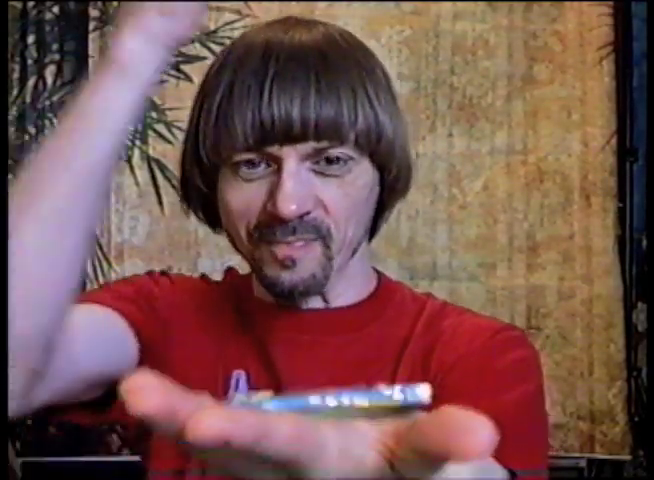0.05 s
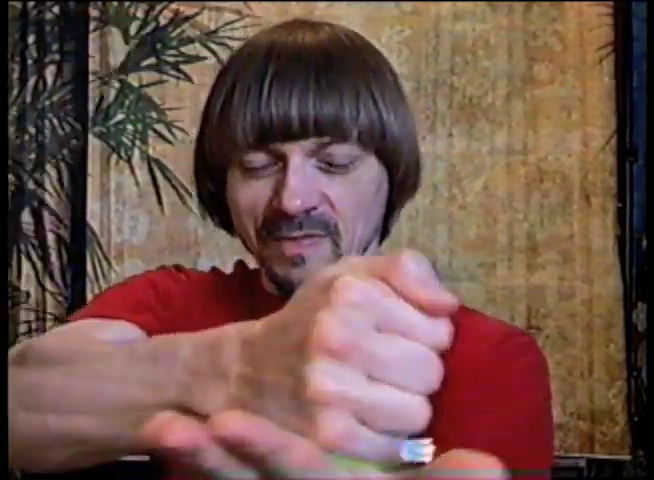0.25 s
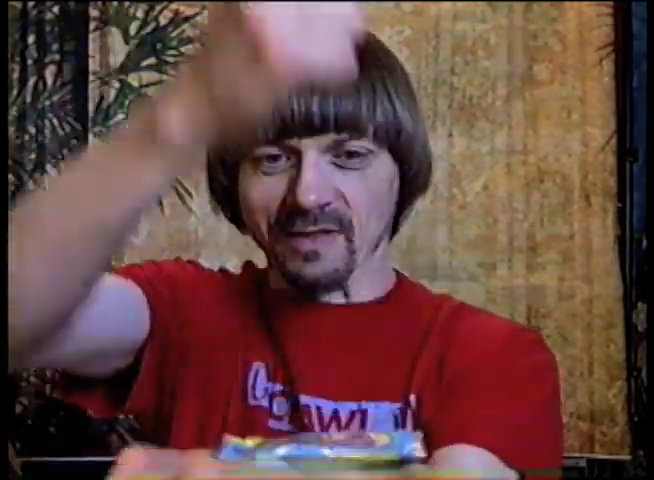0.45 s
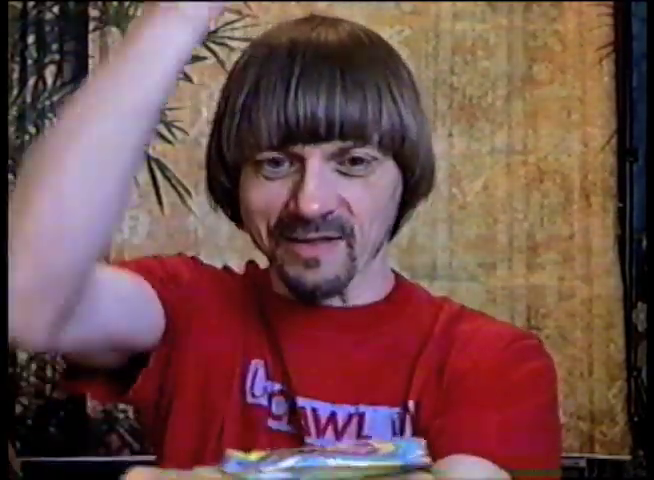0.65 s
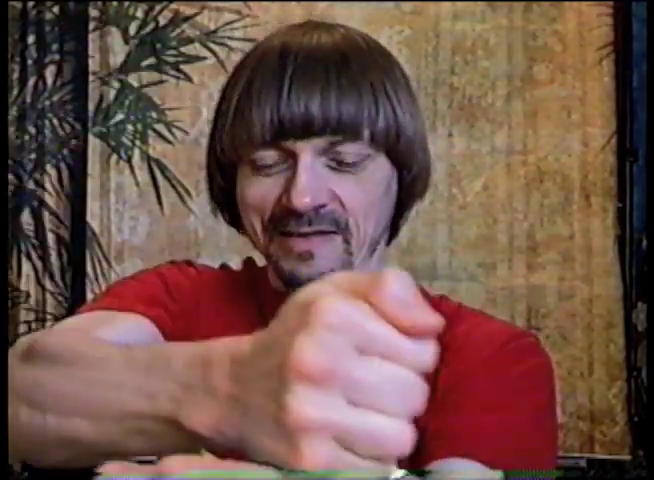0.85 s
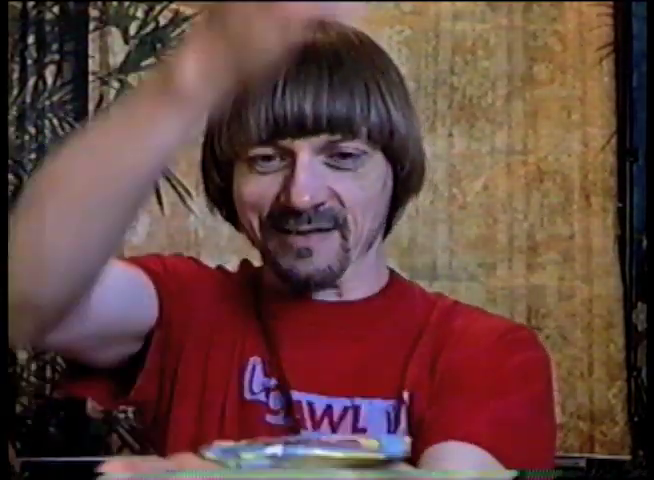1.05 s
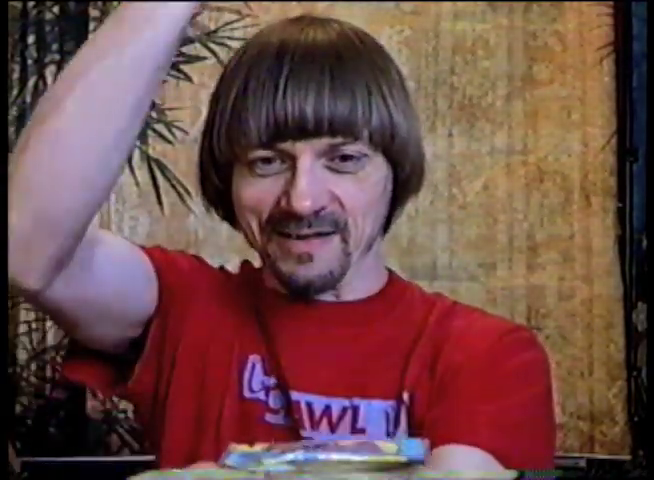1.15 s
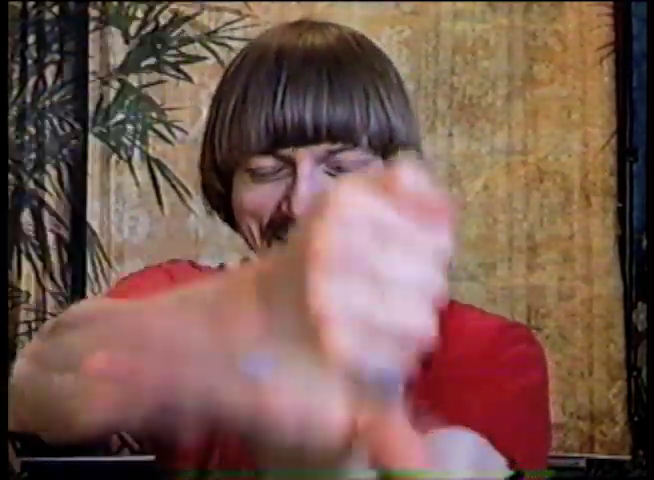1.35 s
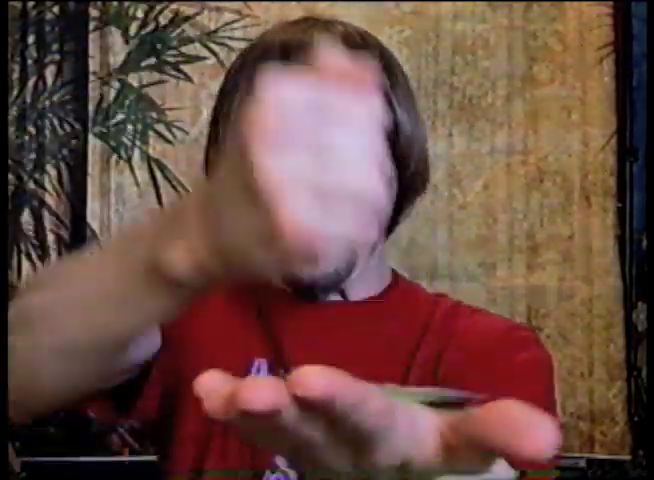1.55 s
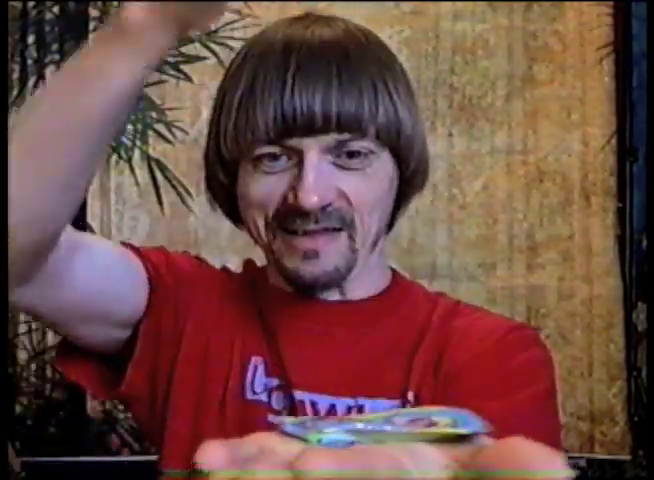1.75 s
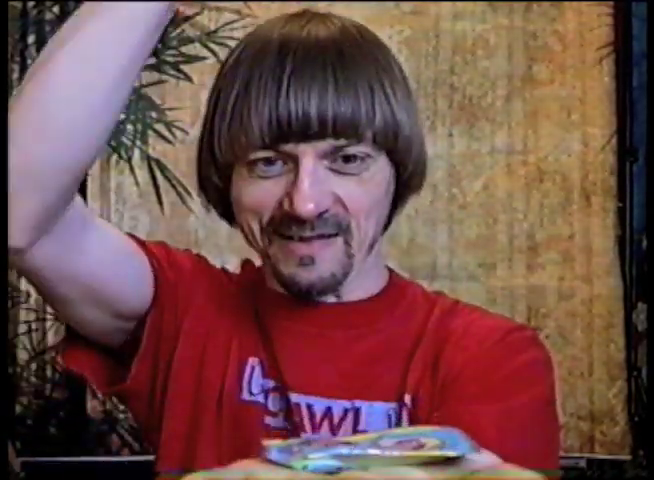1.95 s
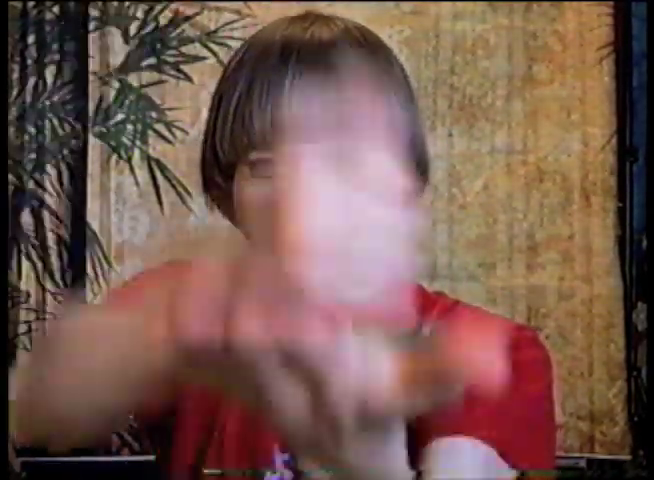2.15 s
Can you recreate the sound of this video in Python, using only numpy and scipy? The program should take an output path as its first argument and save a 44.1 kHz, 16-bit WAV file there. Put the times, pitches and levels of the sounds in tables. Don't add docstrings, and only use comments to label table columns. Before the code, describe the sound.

A fist smacks a foil packet on an open palm at about 0.2, 0.8 and 1.4 seconds. Each is a very short, slightly overloaded crack with a crunch of contents and brief small-room echo. The first is fullest, the second brighter and foil-like, the third lower. Foil ticks and rustles at 0.34-0.5, 0.95-1.2 and 1.5-1.6 seconds, over faint tape hiss, motor rumble and mains hum.

```python
import sys
import numpy as np
from scipy import signal
from scipy.fft import rfft, irfft
from scipy.io import wavfile
from scipy.ndimage import uniform_filter1d

SR = 44100
rng = np.random.default_rng(int(sys.argv[2]) if len(sys.argv) > 2 else 0)


def transcribe(signal):
    frames = np.atleast_2d(signal).T
    limited = np.clip(frames, -1, 1)
    pcm = np.round(limited * 32767).astype(np.int16)
    wavfile.write(sys.argv[1], SR, pcm)


def volts_from_decibels(level):
    exponent = np.asarray(level, float) / 20
    return 10 ** exponent


N = 97020


def curve(hz, table):
    table = np.array(table, float)
    return np.interp(np.log(np.maximum(hz, 1)), np.log(table[:, 0]), table[:, 1])


def ring(x, hz, width_hz):
    sharpness = max(hz / width_hz, 0.3)
    return signal.lfilter(*signal.iirpeak(hz, sharpness, fs=SR), x)


def highpass(x, order, hz):
    return signal.lfilter(*signal.butter(order, hz, "high", fs=SR), x)


def colour(x, table):
    gain = volts_from_decibels(curve(np.fft.rfftfreq(2048, 1 / SR), table))
    cepstrum = irfft(np.log(gain))
    cepstrum[1:1024] *= 2
    cepstrum[1025:] = 0
    response = irfft(np.exp(rfft(cepstrum)))[:1024]
    return signal.fftconvolve(x, response)[:len(x)]


def unit(x):
    return x / np.sqrt(np.mean(x ** 2))


def grains(per_s, spread_db):
    happens = rng.random(N) < per_s / SR
    size = volts_from_decibels(spread_db * rng.exponential(size=N))
    return unit(happens * size * np.sign(rng.standard_normal(N)))


def walk(rate_hz):
    k = int(SR / rate_hz)
    return unit(uniform_filter1d(uniform_filter1d(rng.standard_normal(N), k), k))


def smacks(t):
    # start_s, palm_db, pack_db, foil_db, palm_pitch_hz
    smack_rows = [
        (.2078, -9, -2.5, -3.5, 875),
        (.826, -10.5, -12, 0, 883),
        (1.409, -11.5, -5, -7, 634),
    ]
    # pitch_hz, level_db, thud_db
    crack_rows = [
        (2480, -2, -25.5),
        (6013, -4.5, -19.5),
        (2370, -0.5, -32),
    ]
    near = far = 0
    for (start, *levels_db, palm_hz), (crack_hz, crack_db, thud_db) in zip(smack_rows, crack_rows):
        age = np.maximum(t - start, 0)
        begun = t >= start
        # (pitch_hz, width_hz) of palm, pack and foil sheet
        parts = [(palm_hz, 0.88 * palm_hz), (2450, 1700), (4630, 4100)]

        def body(x):
            return sum(volts_from_decibels(db) * ring(x, hz, width) * np.sqrt(SR / 4 / width)
                       for db, (hz, width) in zip(levels_db, parts))

        contact = begun * np.exp(-np.maximum(age - 0.0019, 0) / 0.0003)
        settle = volts_from_decibels(-16) * begun * np.exp(-age / 0.005)
        burst = highpass((contact + settle) * rng.standard_normal(N), 2, 0.8 * palm_hz)

        crack = volts_from_decibels(crack_db) * contact * np.sin(2 * np.pi * crack_hz * age)
        palm_tone = volts_from_decibels(-21.5) * begun * np.exp(-age / 0.0052) * np.sin(2 * np.pi * palm_hz * age)
        thud_s = 0.0034
        thud = volts_from_decibels(thud_db) * np.sin(np.pi * np.minimum(age / thud_s, 1))

        crunch_level = volts_from_decibels(-25.5 - 60 * age / 0.32) * np.minimum(age / 0.012, 1) ** 2
        crunch = body(crunch_level * grains(3000, 0.5))
        near = near + body(burst) + crack + palm_tone + crunch + thud

        blow = 1.0 * (np.arange(N) == int(start * SR))
        boom = 20 * volts_from_decibels(19 + thud_db) * ring(ring(blow, 336, 330), 336, 330)
        far = far + volts_from_decibels(19.5) * body(blow) + boom + crunch
    return near, far


def ticks():
    # start_s, foil_peak_db, pack_db (against foil), pack_pitch_hz, length_ms
    tick_rows = [(0.341, -34.5, -6.9, 1913, 0.76), (0.3636, -26.3, -8.3, 2678, 0.52),
                 (0.3707, -21.8, -12.5, 2368, 0.45), (0.3851, -26.0, -6.6, 2312, 0.38),
                 (0.3923, -26.0, -1.6, 2191, 0.64), (0.4383, -25.8, -12.5, 2517, 0.33),
                 (0.4624, -35.9, -3.1, 1195, 0.55), (0.4667, -34.6, -0.3, 3098, 0.44),
                 (0.5018, -34.4, -4.1, 2326, 0.61), (0.5229, -50.8, 8.9, 1984, 0.62),
                 (0.7688, -45.0, -2.7, 2175, 0.73),
                 (0.8497, -12.9, -6.0, 2861, 0.78), (0.9462, -30.6, -3.4, 2230, 0.41),
                    (0.9624, -29.2, -2.0, 2454, 0.34), (0.9742, -26.7, 1.3, 2465, 0.3),
                    (0.9865, -24.0, 2.3, 2606, 0.45), (0.9944, -29.8, -6.5, 1696, 0.86),
                    (1.0003, -36.0, 2.7, 2952, 0.58), (1.0257, -41.1, -0.1, 2714, 0.5),
                    (1.0824, -35.4, -3.2, 1982, 0.25), (1.0847, -24.1, -15.4, 2255, 0.29),
                    (1.0902, -35.9, -7.9, 1407, 0.32), (1.1472, -33.1, -7.2, 2230, 0.27),
                    (1.1887, -20.8, -19.9, 3434, 0.29), (1.2895, -52.1, 1.4, 2365, 0.82),
                    (1.2972, -46.1, 2.5, 1818, 0.44),
                 (1.5161, -28.2, 4.0, 2464, 0.26),
        (1.5277, -25.2, -3.3, 2986, 0.34),
        (1.5384, -29.5, -6.8, 1843, 0.35),
        (1.5852, -33.4, 0.9, 2423, 0.73),
        (1.9062, -40.3, -7.1, 1296, 0.25),
    ]
    length = 1024
    age = np.arange(length) / SR
    click = age == 0
    out = np.zeros((2, N + length))
    for start, foil_db, pack_db, pack_hz, ms in tick_rows:
        followers = volts_from_decibels(-6.5) * rng.standard_normal(length) * np.exp(-age / (ms / 1000))
        snap = np.array([click + followers, click * volts_from_decibels(2.5)])
        foil = highpass(ring(snap, 5000, 5000), 3, 3400)
        pack_width = 1.1 * pack_hz
        pack = ring(ring(snap, pack_hz, pack_width), pack_hz, pack_width)
        tick = foil / abs(foil[0]).max() + volts_from_decibels(pack_db) * pack / abs(pack[0]).max()
        i = int(start * SR)
        out[:, i:i + length] += volts_from_decibels(foil_db + 5) * tick
    return out[:, :N]


def rustle(t):
    # start_s, length_s, level_db
    stretches = [
        (0.339, 0.074, -43),
        (.361, 0.0036, -48),
        (.368, 0.0056, -38),
        (.389, .008, -35),
        (0.77, 0.019, -59),
        (0.945, 0.081, -49),
        (0.977, 0.016, -36.5),
        (1.082, 0.0081, -47.5),
        (1.146, 0.0066, -61),
        (1.512, 0.028, -43),
    ]
    level = 0
    for start, length, db in stretches:
        hump = np.sin(np.pi * np.clip((t - start) / length, 0, 1))
        level = level + volts_from_decibels(db) * np.clip(2 * hump, 0, 1)
    return level * unit(ring(grains(2500, 3), 4000, 5000))


def room(x):
    # pitch_hz, fade_s
    fade_times = [(150, 0.14), (500, 0.35), (1500, 0.28), (4000, 0.25), (8000, 0.17), (13000, 0.27)]
    # pitch_hz, level_db, build_up_s, fade_s
    low_notes = [(155.3, -4, 0.02, 0.38), (278.3, -10, .035, 0.39), (506, 4.5, 0.018, 0.11),
                 (634.3, 1, 0.045, 0.24)]
    age = np.arange(SR // 2) / SR
    early = volts_from_decibels(-11) * np.minimum(age / 0.0038, 1)
    late = np.maximum(age - 0.012, 0) / 0.0061
    build = np.clip(early + late, 0, 1) * volts_from_decibels(1.8 * walk(680)[:len(age)])

    tail = 0
    for hz in 120 * 2 ** np.arange(0, 7.2, 0.5):
        band = ring(rng.standard_normal(len(age)), hz, hz / 2)
        tail = tail + band * volts_from_decibels(-60 * age / curve(hz, fade_times))
    tail = tail * build

    modes = 0
    for hz, db, rise, fade in low_notes:
        swell = volts_from_decibels(db - 60 * age / fade) * np.minimum(age / rise, 1) ** 2
        modes = modes + swell * np.sin(2 * np.pi * hz * age)

    response = tail / np.sqrt(np.sum(tail ** 2)) + volts_from_decibels(-18) * modes / np.sqrt(np.sum(modes ** 2))
    return signal.fftconvolve(x, volts_from_decibels(-10) * response)[:N]


def arm_and_chest(x):
    age = np.arange(512) / SR - 0.002
    echo = (age >= 0) * np.exp(-age / 0.0015) * rng.standard_normal(512)
    return signal.fftconvolve(x, volts_from_decibels(-10) * echo / np.sqrt(np.sum(echo ** 2)))[:N]


def tape_floor(t):
    # pitch_hz, level_db (per Hz)
    hiss_tone = [(25, -5.5), (80, -3), (140, -13), (260, -9), (500, -12), (1500, -20), (6000, -22.5),
                 (16000, -26.5)]
    # pitch_hz, level_db (rms)
    hum_notes = [(30, -66), (60, -61.5), (72, -72.5), (90, -71.5), (120, -75), (180, -75), (240, -71.5),
                 (300, -81)]
    noise = colour(rng.standard_normal(N), hiss_tone)
    rumble = signal.lfilter(*signal.butter(2, 500, fs=SR), noise)
    noise = unit(noise + rumble * (volts_from_decibels(2 * walk(4)) - 1))
    hum = 0
    for hz, db in hum_notes:
        level = volts_from_decibels(db + 1.65 * walk(12)) * np.sqrt(2)
        hum = hum + level * np.sin(2 * np.pi * (hz * t + rng.random()))
    return volts_from_decibels(-58) * noise + hum


def scene():
    t = np.arange(N) / SR
    near, far = smacks(t)
    tick, tick_far = ticks()
    fine = rustle(t)
    direct = near + tick + fine
    return (direct + arm_and_chest(tick_far) + room(far + tick_far + fine))[None]


def top_cut(x):
    return signal.sosfilt(signal.butter(12, 16640, fs=SR, output="sos"), x)


def record(dry):
    # pitch_hz, level_db
    mic_tone = [(100, -8), (300, 2), (3000, -1.5), (7000, -0.5), (10000, -10.5), (12500, -20), (14500, -40),
                (17000, -28)]
    top = volts_from_decibels(-10.5)
    heard = colour(top * np.tanh(dry[0] / top), mic_tone)
    mix = heard + tape_floor(np.arange(N) / SR)
    steep_lowpass = signal.ellip(10, 0.2, 60, 15950, fs=SR, output="sos")
    mix = signal.sosfilt(steep_lowpass, mix)
    return top_cut(mix[None])


dry = scene()
out = record(dry)
transcribe(out)
```